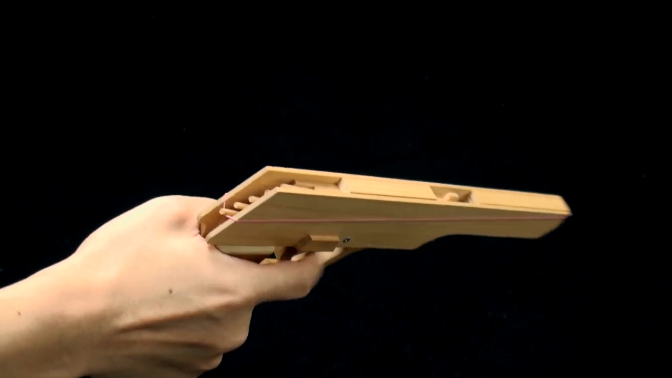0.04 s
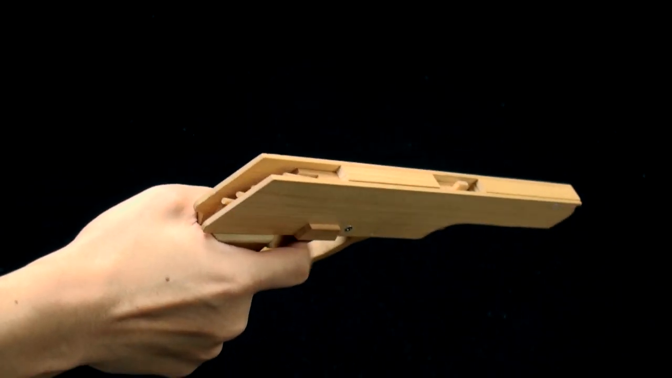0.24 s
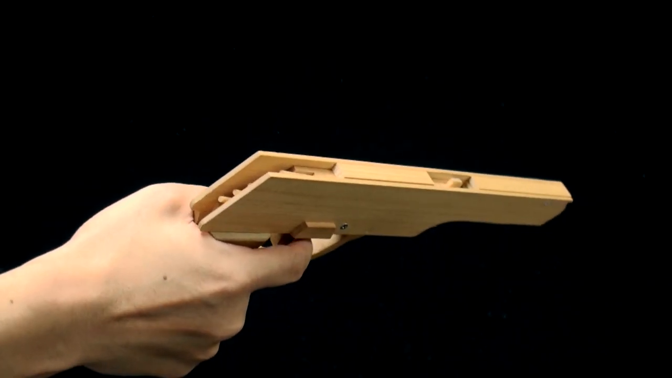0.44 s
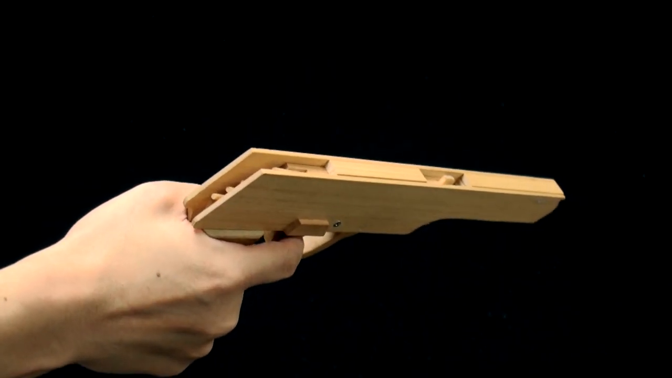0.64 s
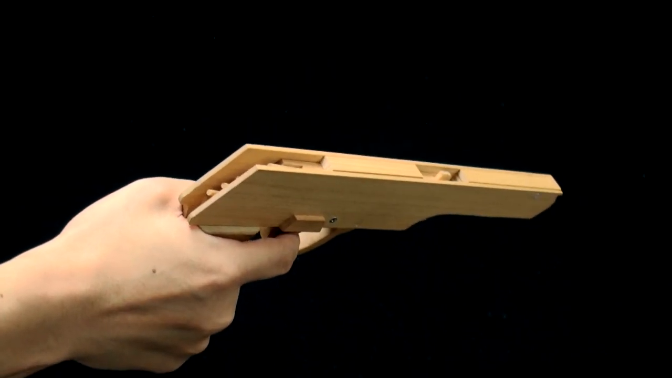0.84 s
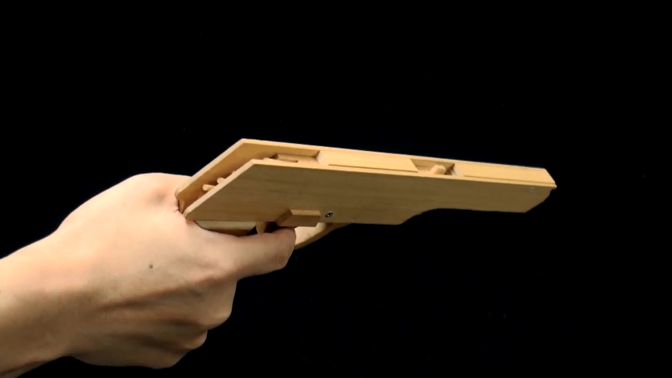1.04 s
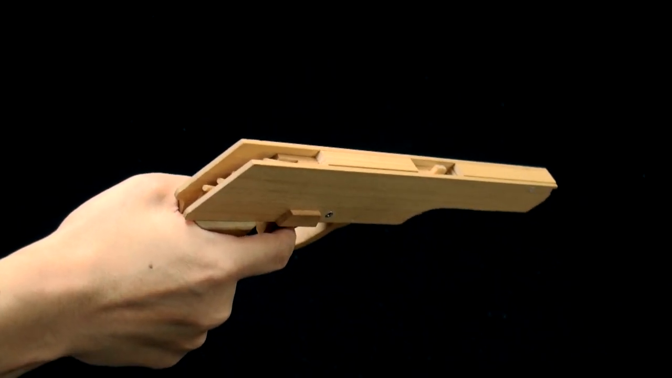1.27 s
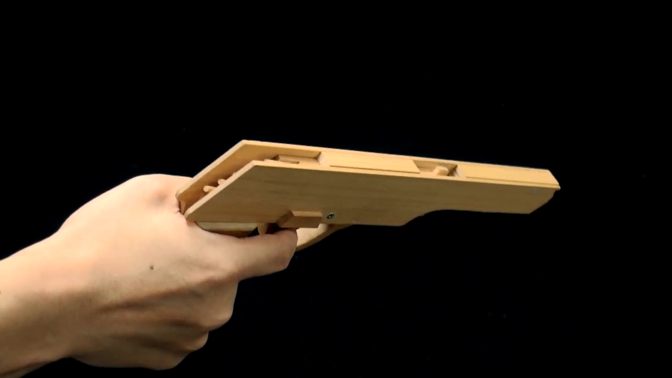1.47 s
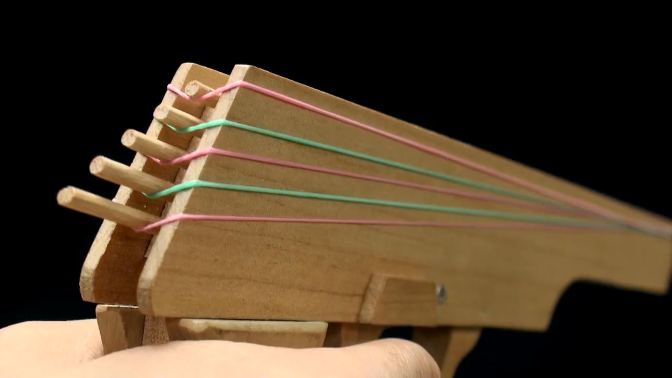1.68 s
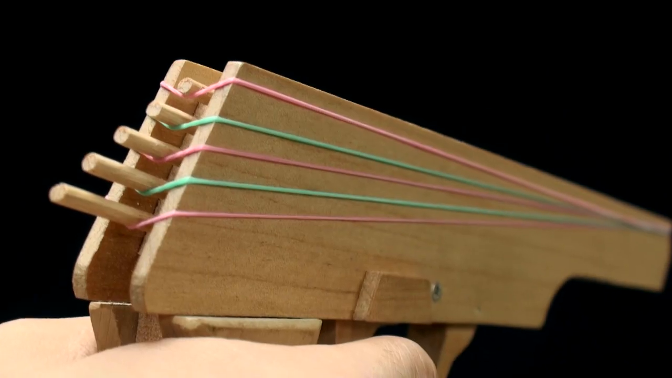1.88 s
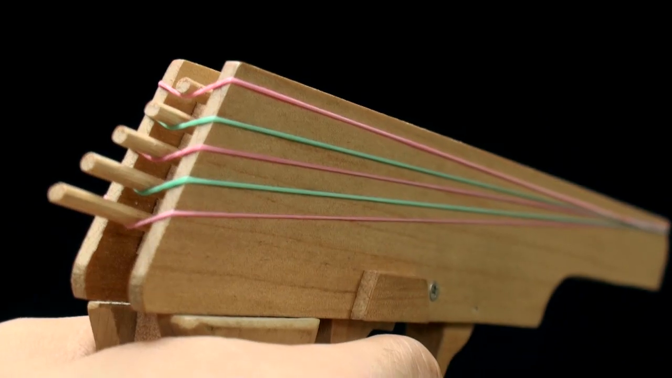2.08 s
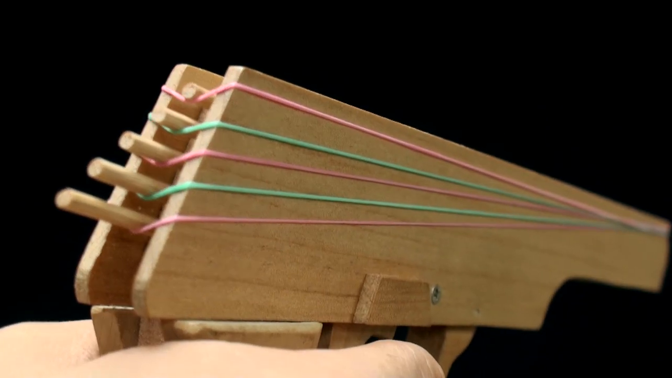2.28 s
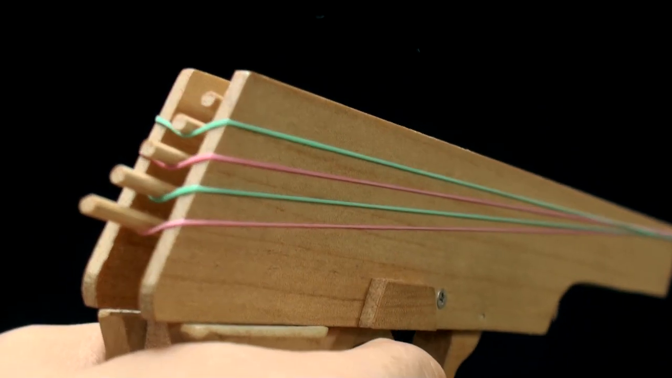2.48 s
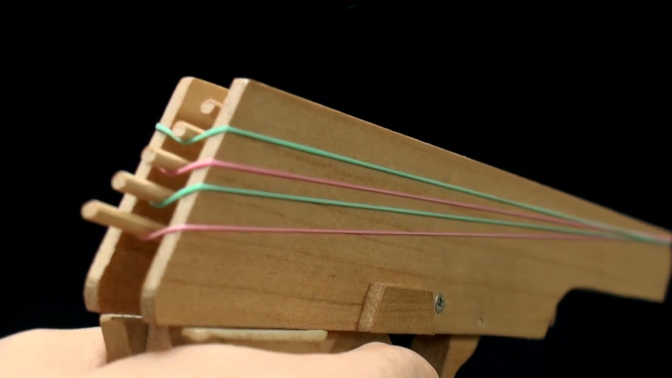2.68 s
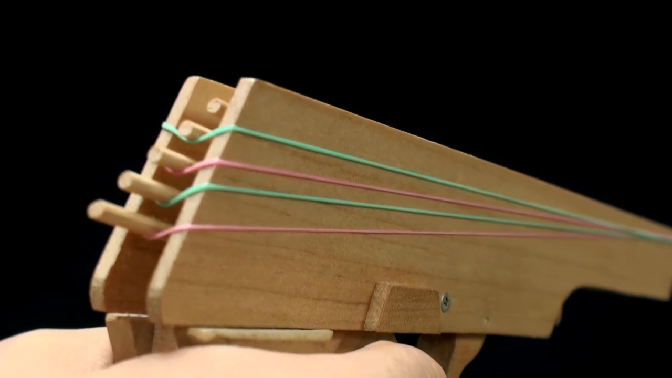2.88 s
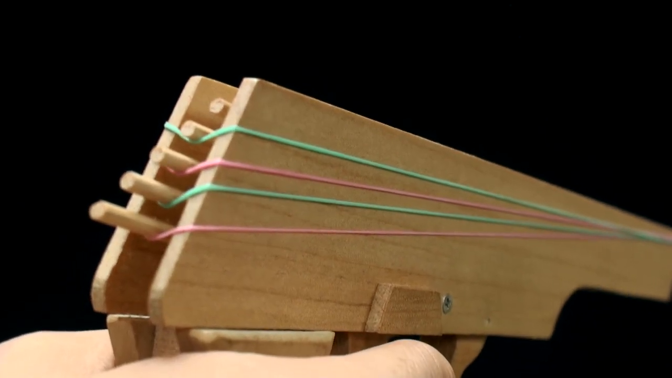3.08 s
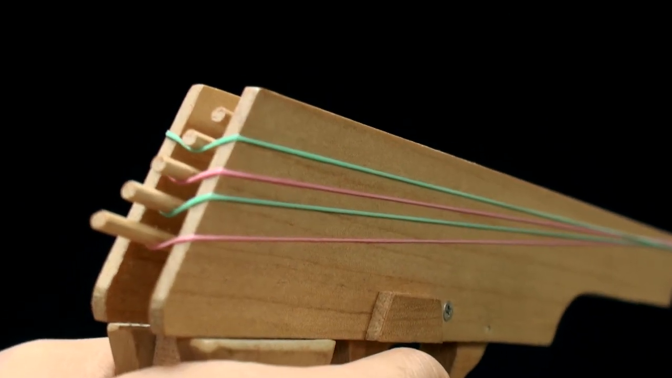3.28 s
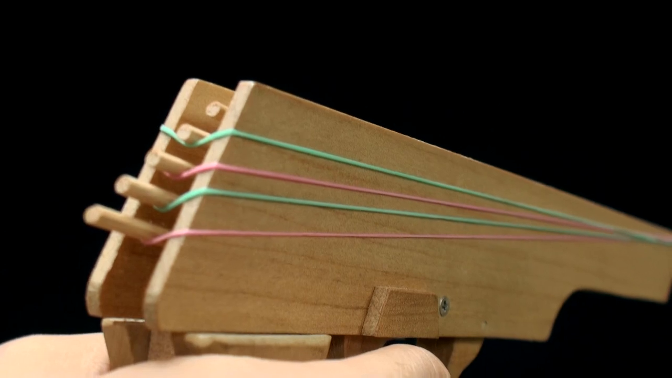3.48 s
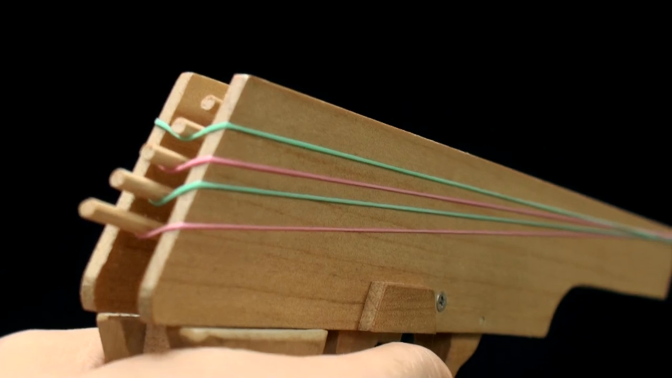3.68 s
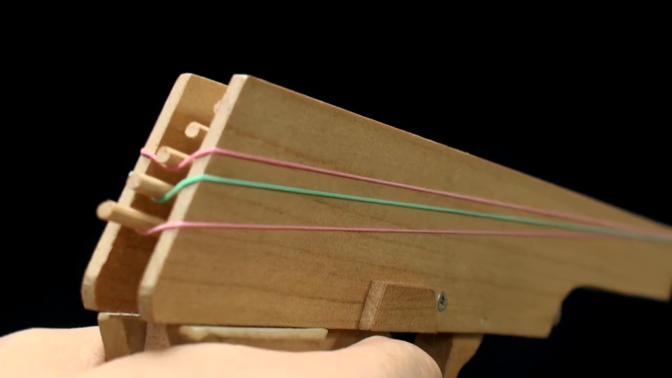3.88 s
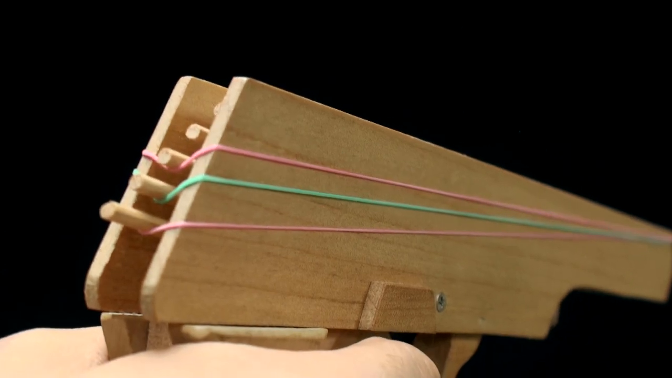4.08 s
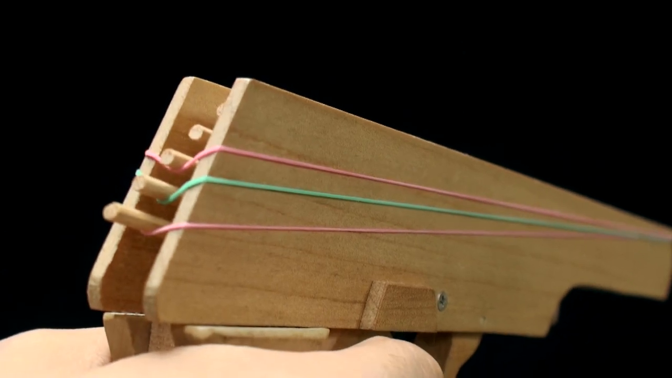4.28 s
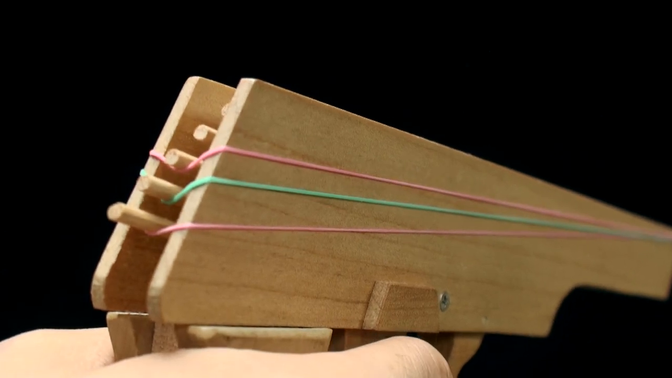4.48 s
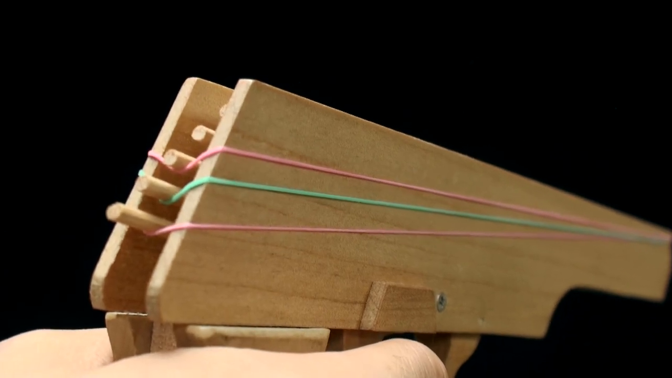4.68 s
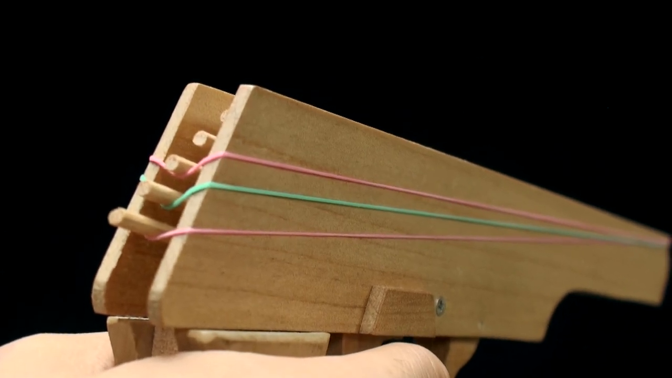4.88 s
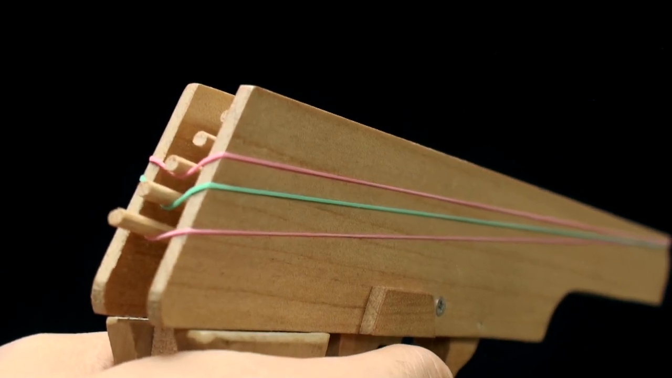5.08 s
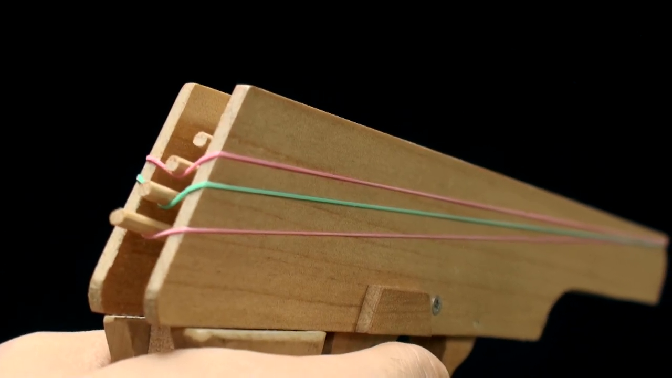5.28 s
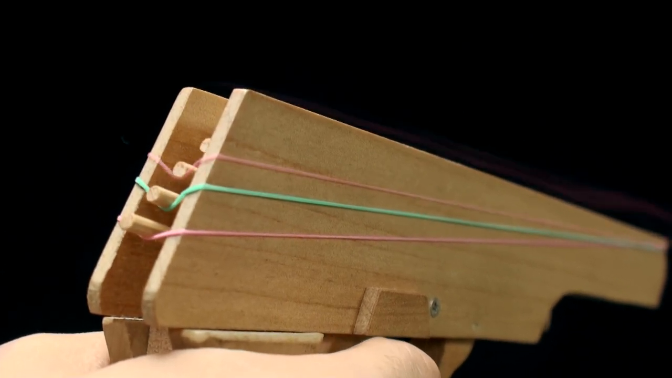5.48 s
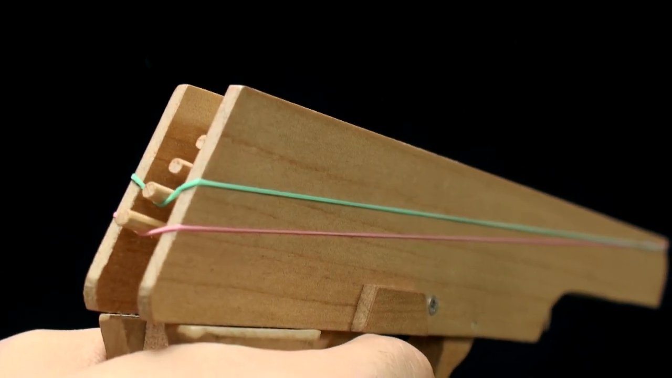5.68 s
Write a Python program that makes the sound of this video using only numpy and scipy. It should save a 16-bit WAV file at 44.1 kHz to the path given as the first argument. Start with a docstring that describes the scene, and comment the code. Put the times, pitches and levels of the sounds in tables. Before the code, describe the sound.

A wooden rubber-band pistol fires in a small hard room: dry clacks, loud hollow slaps, trigger clicks between, over faint hiss and a thin whine.

```python
"""Faint room hiss, mains hum and a narrow whine are there at once, and a band slaps a hollow target.
A wooden rubber-band pistol is being fired in a small hard room: the peg wheel clacks against its catch,
a moment later the band lands, and the trigger clacks back on release, with faint ticks and rubs between.
Each blow is a minimum-phase pulse shaped by modal resonances, heard directly and through a decaying
noise tail of echoes; the bed is coloured noise and sines. A look-ahead limiter flattens the loud slaps."""
import sys
import numpy as np
from scipy import signal
from scipy.fft import rfft, irfft
from scipy.io import wavfile
from scipy.ndimage import uniform_filter1d, minimum_filter1d

SR = 44100
rng = np.random.default_rng(int(sys.argv[2]) if len(sys.argv) > 2 else 0)


def bounce(signal):
    """Save signal as a 16-bit WAV file at the path given by the first command-line argument."""
    frames = np.transpose(np.atleast_2d(signal))
    limited = np.clip(frames, -1, 1)
    pcm = np.round(limited * 32767).astype(np.int16)
    wavfile.write(sys.argv[1], SR, pcm)


N = 253134  # length in samples


def gain_of(db):
    """Level law: decibels to an amplitude factor."""
    return 10 ** (np.asarray(db) / 20)


def evened(x):
    """Normalisation: scales to rms 1."""
    return x / np.sqrt(np.mean(x ** 2) + 1e-20)


def read(points, hz):
    """Interpolation: reads an (f/Hz, value) table on a logarithmic frequency axis."""
    f, value = np.transpose(points)
    return np.interp(np.log(hz + 1), np.log(f + 1), value)


def add(mix, s, sound):
    """Superposition: adds a sound into the mix at time s, cut off at the end."""
    part = mix[..., round(s * SR):][..., :sound.shape[-1]]
    part += sound[..., :part.shape[-1]]


def pair(size, same, shape_db, frame=1024):
    """Partially coherent stereo noise from random short-time spectra, coloured by shape_db(hz, t)."""
    hop = frame // 4
    hz = np.fft.rfftfreq(frame, 1 / SR)[:, None]
    t = np.arange(4 * size // frame + 5) * hop / SR
    a, b, c, d = rng.standard_normal((len(t), len(hz), 4)).T
    left, independent = a + 1j * b, c + 1j * d
    like = np.clip(read(same, hz), -1, 1)
    right = like * left + np.sqrt(1 - like ** 2) * independent
    spectra = np.array([left, right]) * gain_of(shape_db(hz, t))
    return signal.istft(spectra, nperseg=frame, noverlap=frame - hop)[1][:, :size]


# Background hiss spectrum: f/Hz, relative density/(dB per Hz)
HISS_COLOUR = [(15, -38), (25, 9.5), (88, -16), (124, 1), (179, -12), (239, -4.5), (310, -4.5), (598, -4),
               (681, -3.5), (4620, -17), (5550, -13), (6330, -20), (12200, -22), (13200, -41.5)]
# Coherence of hiss and whine: f/Hz, left-right likeness (1 is identical)
HISS_COHERENCE = [(60, 1), (180, 0.74), (550, 0.029), (1650, -0.059), (4970, 0.55), (15000, 0.26)]
# Narrow band of the whine: f/Hz, relative density/(dB per Hz)
WHINE_COLOUR = [(4900, -50.5), (5150, -25), (5400, 10), (5600, 6), (5800, 4), (5930, -10), (6000, -39)]
# Low drone and mains tones after the step, before waver: f/Hz, rms level/dB
HUM_TONES = [(43, -78.5), (120, -82.5), (240, -71.5), (600, -74.5), (840, -74), (1260, -77.5)]
HISS_DB, WHINE_DB = -55.5, -57.7  # rms levels after the step
# the background steps up: middle and length of the step (s), levels before it relative to after (dB)
STEP_S, STEP_FADE_S, EARLY_HISS_DB, EARLY_WHINE_DB = 1.545, 0.068, -3, -3


def spectral_drift(hz, frames):
    """Slow modulation: random patches smoothed over time and frequency, rms 1."""
    patches = rng.standard_normal((len(frames), len(hz)))
    over_time = uniform_filter1d(patches, 10, 0)
    return evened(uniform_filter1d(over_time, 12, 1)).T


def background():
    """Filtered noise drifting in colour, sines wavering in level and a fluttering noise band; one step up."""
    t = np.arange(N) / SR
    before_step = np.clip(.5 - (t - STEP_S) / STEP_FADE_S, 0, 1)
    hiss = evened(pair(N, HISS_COHERENCE, lambda hz, f: read(HISS_COLOUR, hz) + 1.9 * spectral_drift(hz, f)))
    whine = evened(pair(N, HISS_COHERENCE, lambda hz, f: read(WHINE_COLOUR, hz) + 0 * f))
    flutter = evened(uniform_filter1d(uniform_filter1d(rng.standard_normal(N), 300), 300))
    waver = evened(uniform_filter1d(rng.standard_normal((len(HUM_TONES), N)), 9000, 1))
    hum = np.zeros(N)
    for (hz, db), sway in zip(HUM_TONES, waver):
        tone = np.sqrt(2) * np.sin(2 * np.pi * (hz * t + rng.random()))
        hum += gain_of(db + 0.73 * sway) * tone
    room = (gain_of(HISS_DB) * hiss + hum) * gain_of(EARLY_HISS_DB * before_step)
    return room + whine * gain_of(WHINE_DB + EARLY_WHINE_DB * before_step + 0.5 * flutter)


SKIRT = 1.7  # half width times t60; the modes add in power, and each peak's squared shape makes the skirts fall steeply


def strike(colour, tilt_db, rings):
    """Modal excitation: a minimum-phase pulse of energy 1, its power a broad colour plus sets of modes.

    Each set is (modes, level/dB, favoured f/Hz); the contact excites modes near the favoured pitch most."""
    hz = abs(np.fft.fftfreq(8192, 1 / SR))
    octaves = np.log2(np.clip(hz, 300, 9000) / 3000)
    power = evened(gain_of(read(colour, hz) + tilt_db * octaves)) ** 2
    for modes, set_db, favoured_hz in rings:
        f, db, t60 = np.transpose(modes)[:, :, None]
        db = db - 11.4 * np.log2(f / favoured_hz) ** 2 + 0.39 * rng.standard_normal(f.shape)
        peaks = gain_of(db) / (1 + ((hz - f) * t60 / SKIRT) ** 2)
        resonance = evened(np.linalg.norm(peaks, axis=0))
        power = power + (gain_of(set_db) * resonance) ** 2
    # the Hilbert transform of the log magnitude gives the phase of a causal pulse
    log_spectrum = np.conj(signal.hilbert(np.log(power + 1e-10) / 2))
    pulse = np.fft.ifft(np.exp(log_spectrum)).real[:4000]
    return pulse / np.linalg.norm(pulse)


# Reverberation of the room: f/Hz, t60/s
ROOM_DECAY = [(125, 0.4), (350, 0.35), (900, 0.5), (2300, 0.46), (6000, 0.36), (13000, 0.25)]
# Coherence of the echoes: f/Hz, left-right likeness (1 is identical)
ROOM_COHERENCE = [(60, 0.99), (180, 0.83), (550, 0.8), (1650, 0.65), (4970, 0.81), (15000, 0.54)]


def echoes(gap_s, swell_s, early):
    """Reverberation: after a gap a noise tail swells, strongest early; each band dies at its own speed."""
    tail = pair(round(.6 * SR), ROOM_COHERENCE, lambda hz, t: -60 * t / read(ROOM_DECAY, hz), frame=256)
    t = np.arange(tail.shape[1]) / SR
    onset = np.clip((t - gap_s) / swell_s, 0, 1)
    near_surfaces = 1 + early * np.exp(-t / 0.0094)
    tail = tail * onset * near_surfaces
    return tail / np.linalg.norm(tail[0])  # left channel has energy 1


def heard(blow, near, chatter_s, pan_db, room_db, tail):
    """Direct and reverberant field: the near pulse with a chattering contact, plus the blow off the walls."""
    t = np.arange(600) / SR
    chatter = rfft(rng.standard_normal(600) * t * np.exp(-t / chatter_s))
    # partly whitened, it spreads the blow in time and colours it little
    chatter = irfft(chatter / abs(chatter) ** 0.15) * np.exp(-t / 0.0052)
    direct = np.convolve(near, chatter)
    sound = gain_of(room_db) * signal.fftconvolve(blow[None], tail, axes=1)
    add(sound, 0, np.array([direct, direct]) / np.linalg.norm(direct))
    return sound * gain_of([[pan_db / 2], [-pan_db / 2]])


# Rubber on the target: f/Hz, relative level/dB
WHIP_COLOUR = [(47, -46), (80, -33), (459, -7), (640, -10.5), (891, -0.5), (973, -4), (3140, -7),
               (6970, -7), (14500, -17), (15800, -61)]
# Hollow modes of the target: f/Hz, relative level/dB, nominal t60/s
HOLLOW_MODES = [(220, -2.5, 0.065), (343, -4, 0.012), (457, 4, 0.028), (575, 0, 0.05), (712, 3, 0.027)]
# Modes of the target's face: f/Hz, relative level/dB, nominal t60/s
FACE_MODES = [(1050, 3.5, 0.0046), (1650, 5, 0.01), (2577, 2.5, 0.0038), (2860, 2, 0.0067),
              (3188, 10, 0.055), (4150, 7, 0.034), (5200, -14, 0.01), (6600, -6, 0.0088)]
# Something in the room rings on faintly: f/Hz, mean level re slap/dB, t60/s
LINGERING_TONES = [(582.5, -50.5, 0.59), (1963, -58.5, 0.9), (2940, -70, 0.7)]


def slap(db, boom_db, boom_hz, face_db, spot_hz):
    """Impact on a hollow body: a whip, a boom and a face ring, far away and mostly reverberant."""
    rings = [(HOLLOW_MODES, boom_db, boom_hz), (FACE_MODES, face_db, spot_hz)]
    blow = strike(WHIP_COLOUR, 3, rings)  # tilt in dB per octave
    sound = heard(blow, blow, chatter_s=0.00022, pan_db=-1.44, room_db=9.11,
                  tail=echoes(gap_s=0.0005, swell_s=0.0017, early=0.13))
    t = np.arange(sound.shape[1]) / SR
    hz, ring_db, t60 = np.transpose(LINGERING_TONES)[:, :, None]
    ring_db = ring_db + 4.0 * rng.standard_normal(hz.shape) - 60 * t / t60
    lingering = (gain_of(ring_db) * np.sin(2 * np.pi * hz * t)).sum(0)
    return gain_of(db) * (sound + lingering)


# Band landings, once with a light first touch:
# t/s, slap level/dB, boom level/dB, boom f/Hz, face ring level/dB, f favoured by the spot/Hz
SLAP_EVENTS = [(0.0005, 16.5, -18.5, 383, -11.5, 1090), (0.1943, 15, -10.5, 525, -5.5, 2260),
               (2.4427, 18.5, -9, 450, -9, 3240), (3.880, 11, -17, 457, -8.5, 2500),
               (3.884, 18.5, -9, 473, -13.5, 4200), (5.5673, 17.5, -14.5, 346, -4, 2000)]


def add_slaps(mix):
    """Superposed impacts: the band piles up on the target."""
    for s, *row in SLAP_EVENTS:
        add(mix, s, slap(*row))


# First contact of the wood: f/Hz, relative level/dB
CRACK_COLOUR = [(300, -40), (1250, -14), (1600, 1), (4500, -3.5), (8000, -3.5), (13500, -12), (15500, -46)]
# Modes of the pistol's frame: f/Hz, relative level/dB, nominal t60/s
FRAME_MODES = [(1690, 9.5, 0.054), (1953, 9, 0.0069), (2507, 7.5, 0.0093), (3130, 1, 0.01),
               (3550, -4, .012), (3890, 4, 0.0058), (4510, 4, 0.012), (5420, -3, 0.0013)]
# Modes of the grip: f/Hz, relative level/dB, nominal t60/s
GRIP_MODES = [(140, -11, 0.025), (242, 2.5, 0.023), (523, -1.5, 0.012), (770, 0.5, 0.014),
              (1064, 7.5, 0.012)]
# Mode of the peg: f/Hz, relative level/dB, nominal t60/s
PEG_MODES = [(7530, -.5, 0.0074)]


def clack(db, tilt_db, favoured_hz, frame_db, grip_db=-24, grip_hz=900., peg_db=-22, room_db=-4.5,
          chatter_s=0.0011):
    """Impact of wood on wood: a broadband crack exciting the modes of frame, grip and peg."""
    def pulse(more_grip_db, more_tilt_db):
        rings = [(FRAME_MODES, frame_db, favoured_hz), (GRIP_MODES, grip_db + more_grip_db, grip_hz),
                 (PEG_MODES, peg_db, 7500.)]
        return strike(CRACK_COLOUR, tilt_db + more_tilt_db, rings)

    # in the direct sound the grip is stronger and the crack duller than off the walls
    off_walls = pulse(0, 0.5)
    direct = pulse(5.5, -1)
    tail = echoes(gap_s=0.0026, swell_s=0.002, early=1.55)
    return gain_of(db) * heard(off_walls, direct, chatter_s, -1.1, room_db, tail)


# Small faint ticks, some just before the louder clacks:
# t/s, blow level/dB, tilt/(dB per octave), favoured f/Hz
TICK_EVENTS = [(.154, -2, -2.5, 2500), (2.1147, -27.5, -5, 2500), (2.986, -28, -1, 2010),
               (3.008, -29, -13, 1500), (3.627, -25, -4, 2210), (3.732, -21.5, 2, 7000),
               (3.737, -25, -16, 1700), (3.789, -17, -2, 4600), (3.8322, -13.5, 10, 4340),
               (3.837, -20, -5, 4500), (3.851, -19, -10, 5500), (4.3832, -26.5, -4, 7000),
               (4.395, -23, -2, 2000), (5.239, -31.5, -9, 2500), (5.3861, -17, 0, 2600),
               (5.397, -14, -2, 3570), (5.402, -22, 2, 2300), (5.407, -20, 6, 2300),
               (5.512, -35, -19, 2500), (5.5154, -23, 2, 3150)]


def add_ticks(mix):
    """Weak modal excitation: small faint ticks, each made like a clack at a lower level."""
    for s, *row in TICK_EVENTS:
        add(mix, s, clack(*row, frame_db=3, room_db=-4))


# The peg wheel lets a band go and hits its catch: t/s, bounce delay/s, blow level/dB,
# tilt/(dB per octave), favoured f/Hz, frame ring level/dB
RELEASE_EVENTS = [(0.1719, .0022, 5, -1, 3180, 2), (2.4130, 0.0012, 13.5, -0.5, 2100, -6),
                  (3.8561, .0015, 23, -0.6, 4350, 1), (5.5362, 0.0019, 21, -1.5, 4450, 0.5)]
BOUNCE_DB, BOUNCE_PITCH = -1.5, 0.74  # level re first blow; the bounce favours lower modes
RELEASE_ROOM_DB, EARLY_ROOM_DB = -2.2, 4  # echo share; extra echo before the background steps up


def add_releases(mix):
    """Impact and rebound: the peg wheel strikes its catch and bounces once."""
    for s, bounce_s, db, tilt_db, hz, frame_db in RELEASE_EVENTS:
        room_db = RELEASE_ROOM_DB + EARLY_ROOM_DB * (s < STEP_S)
        for late_s, more_db, lower in ((0, 0, 1), (bounce_s, BOUNCE_DB, BOUNCE_PITCH)):
            blow = clack(db + more_db, tilt_db, hz * lower, frame_db, grip_db=-20, grip_hz=430,
                         room_db=room_db, chatter_s=0.00044)
            add(mix, s + late_s, blow)


# Skin on wood: f/Hz, relative density/(dB per Hz)
RUB_SPECTRUM = [(900, -19), (2000, -12), (3100, -7), (4500, -13), (6500, -15), (8000, -31), (11000, -60)]
# Finger strokes easing the trigger forward, one row per return: length/s, level/dB
FINGER_STROKES = [(.09, -52), (.12, -56)]
STROKE_RISE_S, STROKE_STOP_S = 0.051, .015


def rub():
    """Friction noise: a soft hiss swells under each stroke and fades quickly once the trigger returns."""
    t = np.arange(N) / SR
    hiss = evened(pair(N, ROOM_COHERENCE, lambda hz, f: read(RUB_SPECTRUM, hz) + 0 * f))
    envelope = np.zeros(N)
    for (length, db), (end, *_) in zip(FINGER_STROKES, RETURN_EVENTS):
        rise = (t - end + length) / STROKE_RISE_S
        stop = 1 + (end - t) / STROKE_STOP_S
        envelope += gain_of(db) * np.clip(np.minimum(rise, stop), 0, 1)
    return hiss * envelope


# The trigger springs back and rings the frame: t/s, blow level/dB, tilt/(dB per octave),
# favoured f/Hz, grip thud level/dB, peg ping level/dB, echo share level/dB
RETURN_EVENTS = [(3.0922, 8, -5, 2850, -6.5, -15, -3), (4.5172, 11, -3, 3030, -14, -6.5, -2.1)]


def add_returns(mix):
    """Spring-driven impact: the returning trigger strikes and the frame modes ring strongly."""
    for s, db, tilt_db, hz, grip_db, peg_db, room_db in RETURN_EVENTS:
        blow = clack(db, tilt_db, hz, frame_db=9, grip_db=grip_db, grip_hz=850, peg_db=peg_db,
                     room_db=room_db, chatter_s=0.0019)
        add(mix, s, blow)


def scene():
    """Superposition of blows, rubs and background; bodies so small radiate no deep bass."""
    blows = np.zeros((2, N))
    add_slaps(blows)
    add_ticks(blows)
    add_releases(blows)
    add_returns(blows)
    bass_cut = signal.butter(2, 110., "highpass", fs=SR, output="sos")
    blows = signal.sosfilt(bass_cut, blows)
    return blows + rub() + background() * gain_of([[.4], [-.4]])  # bed slightly to the left


THRESHOLD_DB, LET_GO_DB_PER_S = -12.0, 132.0
EDGE_HZ = 15945  # upper band limit


def record(dry):
    """Dynamic range limiting: looks ahead, clamps fast, lets go at a steady rate; then a low-pass."""
    power = abs(uniform_filter1d((dry ** 2).mean(0), 60))
    power_db = 10 * np.log10(power + 1e-12)
    ahead_db = -minimum_filter1d(-power_db, size=161)  # running maximum, 80 samples each way
    fall = np.arange(N) * LET_GO_DB_PER_S / SR
    envelope_db = np.maximum.accumulate(ahead_db + fall) - fall
    over_db = np.maximum(envelope_db - THRESHOLD_DB, 0)
    held = dry / gain_of(1.166 * uniform_filter1d(over_db, 40))  # cuts by more than the excess
    low_pass = signal.firwin(255, EDGE_HZ, window=("kaiser", 9), fs=SR)
    return signal.oaconvolve(held, low_pass[None], "same")


dry = scene()
out = record(dry)
bounce(out)
```